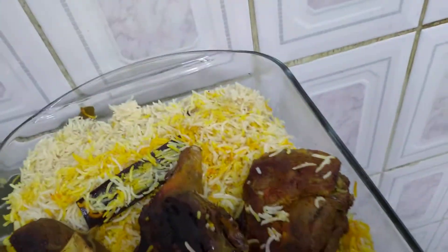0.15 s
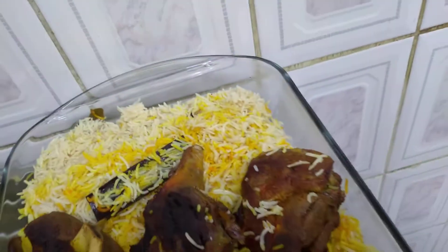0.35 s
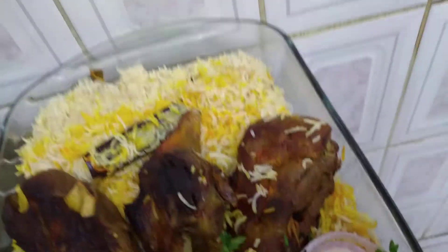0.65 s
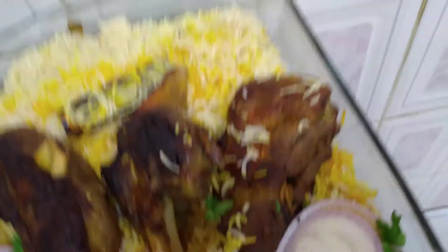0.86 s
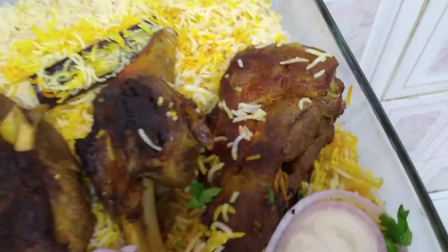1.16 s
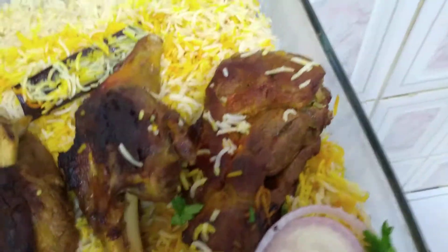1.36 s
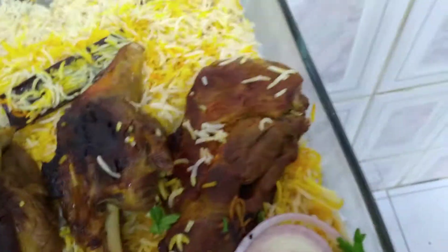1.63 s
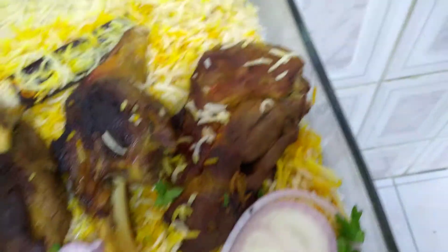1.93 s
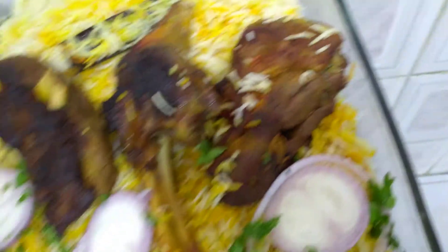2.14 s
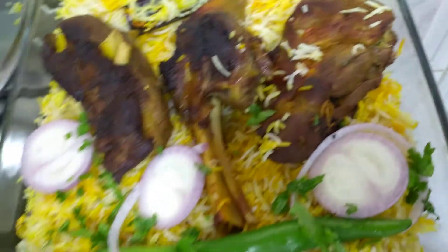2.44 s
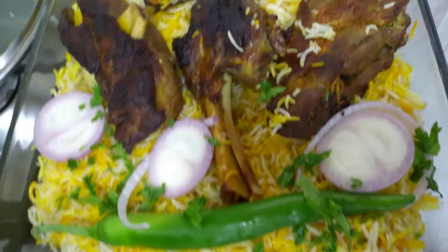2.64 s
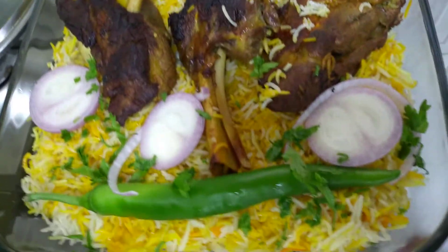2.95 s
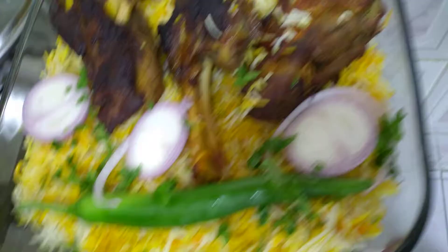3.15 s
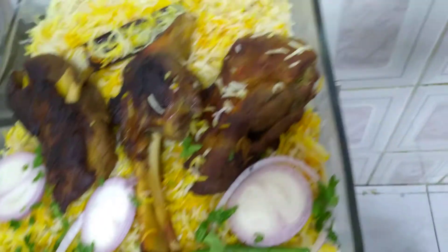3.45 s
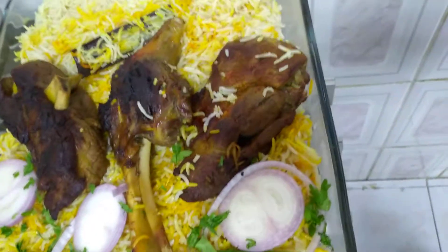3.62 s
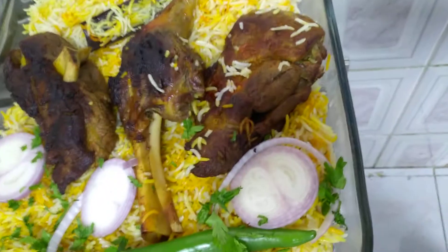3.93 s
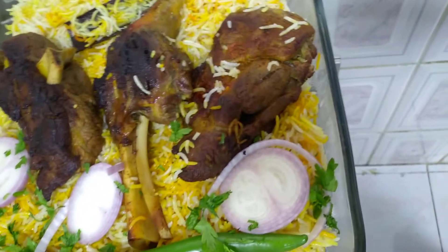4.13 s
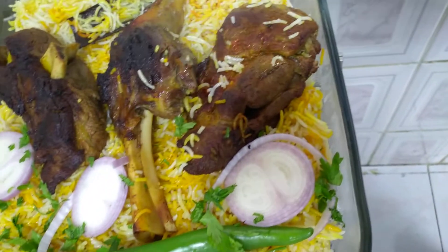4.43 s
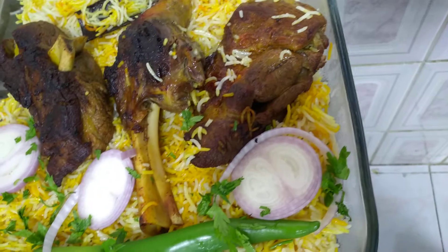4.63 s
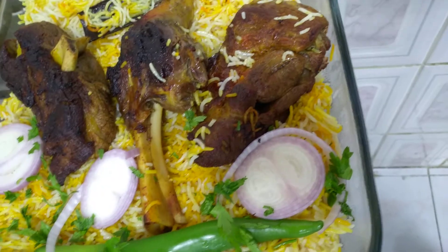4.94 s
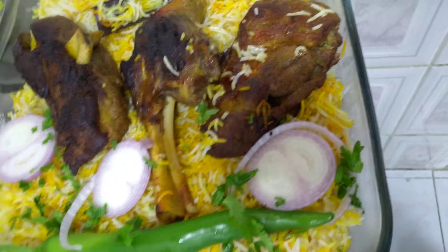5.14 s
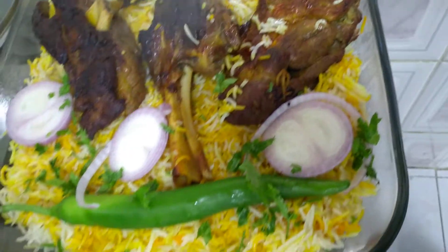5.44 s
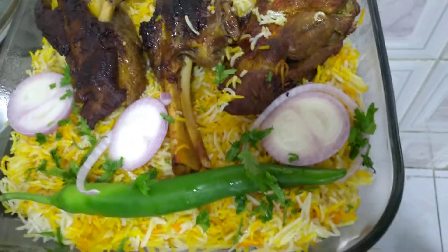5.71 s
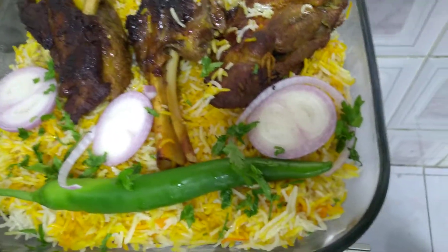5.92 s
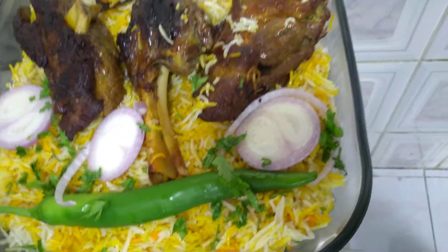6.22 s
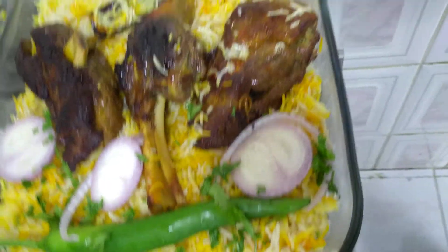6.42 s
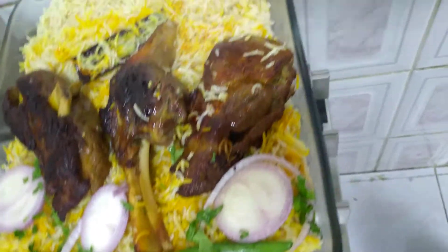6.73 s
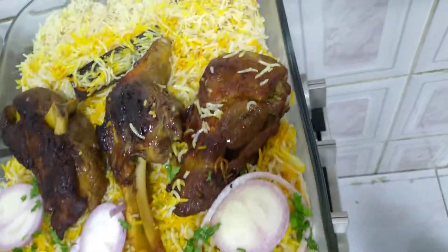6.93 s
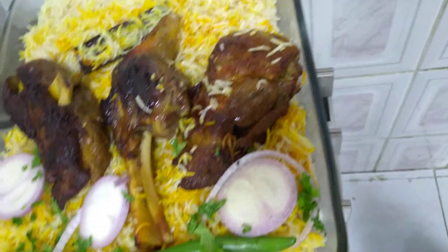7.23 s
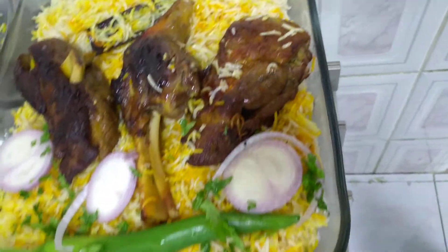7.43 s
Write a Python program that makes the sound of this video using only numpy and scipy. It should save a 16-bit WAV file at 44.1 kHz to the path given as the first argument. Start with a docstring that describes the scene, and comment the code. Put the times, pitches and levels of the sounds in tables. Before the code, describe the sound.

A quiet kitchen hums softly beneath light air hiss and faint flickering tones. A small plastic bottle is tapped and handled, with crisp high clicks growing louder in the middle. Four dry, fizzy nozzle sprays follow in the second half, each under half a second, near the microphone, briefly reflecting off hard tiles. The room hiss returns between and after them.

```python
"""Pump bottle over a glass dish

A small bottle is tapped on a counter, uncapped and pressed four times in a tiled kitchen.
Presses are shaped noise jets, contacts are blows through resonances; both get a decaying noise tail.
An appliance hums in beating sines; short faint tones and narrow noise bands flicker over hiss.
Two ports hear it from close by; the jet and many of the cracks peak near 9 kHz."""
import sys
import numpy as np
from scipy import signal
from scipy.fft import rfft, irfft, next_fast_len
from scipy.io import wavfile
from scipy.ndimage import uniform_filter1d, map_coordinates

SR = 44100
rng = np.random.default_rng(int(sys.argv[2]) if len(sys.argv) > 2 else 0)


def unload_audio(sound):
    """Save the sound as a 16-bit wav file, at the path given as the first command line argument."""
    columns = np.transpose(np.atleast_2d(sound))
    # keep every value between -1 and 1, then stretch to whole-number steps
    steps = np.round(np.clip(columns, -1, 1) * 32767)
    wavfile.write(sys.argv[1], SR, steps.astype(np.int16))


N = 333837
TIME = np.arange(N) / SR

# room air and hiss, relative spectrum: f/Hz, density/dB
FLOOR_SPECTRUM = [(13, -52), (22, -31.5), (76, -3), (103, -3.5), (293, -16), (346, -15), (707, -18),
                  (958, -21.5), (1260, -20.5), (1660, -24.5), (2070, -25.5), (5140, -33.5), (6960, -32.5),
                  (9680, -22.5), (15900, -54)]
# restless part of the room air, relative spectrum: f/Hz, density/dB
STIR_SPECTRUM = [(250, -33.5), (400, 0), (800, 1), (1300, -5), (2300, -15), (3500, -26)]
FLOOR_RMS_DB, STIR_RMS_DB = -59.5, -65.5
# likeness of left and right in diffuse sound: f/Hz, likeness/1
PORT_LIKENESS = [(60, 0.97), (130, 0.96), (290, 0.96), (640, 0.97), (1400, 0.05), (15000, 0.022)]
# decay of the tiled room: f/Hz, t60/s
ROOM_T60 = [(300, 0.12), (1400, 0.29), (4000, 0.27), (10000, 0.24), (16000, 0.19)]

# appliance tones: f/Hz, mean rms level/dB before pan, phase wander/rad
HUM_TONES = [(101.6, -62, 0.7), (115, -68.5, 1), (170.7, -72, 1.3), (63.3, -73, 8.3)]
# soft low bumps: t/s, level/dB before trim and bump shape
BUMPS = [(1.839, -34), (2.401, -35), (2.525, -39), (2.82, -42), (4.072, -38), (4.902, -39.5), (6.293, -34),
         (7.28, -38.5), (7.337, -34)]

# swells of a rough band near 1 kHz: t/s, length/s, level/dB before port trim, f/Hz
LOWER_SWELLS = [(.005, .07, -58, 1020), (.12, .04, -50.5, 1020), (.35, .07, -51.5, 1027),
                (.63, .05, -58.5, 986), (.71, .07, -60, 985), (.92, .09, -55.5, 1000),
                (1.04, .04, -55.5, 970), (1.16, .12, -58, 1080), (1.47, .07, -61, 1020),
                (1.913, 0.059, -62, 983), (2.03, .04, -53, 920), (2.1, .05, -50.5, 1000),
                (2.173, .04, -54.5, 1004), (2.395, .05, -57.5, 950), (2.71, 0.058, -54, 1010),
                (3.11, .03, -51, 980), (3.24, .025, -48.5, 1000), (3.281, .06, -51.5, 970),
                (3.48, .03, -53, 1037), (3.68, .055, -53, 995), (3.92, .04, -60.5, 982),
                (4.113, .015, -51, 955), (4.71, .06, -54, 1008), (4.84, .05, -62, 980),
                (5.04, .04, -57.5, 995), (5.92, 0.025, -46, 1002), (6.49, .06, -61.5, 1000)]
# swells of a thinner band above it: t/s, length/s, level/dB before port trim
UPPER_SWELLS = [(0.002, 0.062, -58.5), (.43, 0.048, -61), (.74, .04, -63), (1.02, 0.035, -53),
                (1.172, .03, -58), (1.27, .07, -63), (1.52, .04, -63.5), (1.74, 0.035, -55.5),
                (1.842, 0.059, -56.5), (1.908, 0.032, -60), (2.08, 0.045, -56), (2.375, .07, -58.5),
                (3.87, .07, -60), (4.57, .1, -59), (5.785, 0.044, -60.5)]
UPPER_BAND_HZ, SWELL_RISE_S = 1584, .009
# fainter noise bands: f/Hz, width/Hz, level/dB at the louder port, left-right/dB
FAINT_BANDS = [(355, 16, -72, 14.5), (495, 58, -72.5, 0), (766, 50, -84.5, 1.5), (2000, 73, -78.5, -7.5),
               (2370, 80, -82.5, 5.5)]
# short tones: t/s, f/Hz, level/dB before flutter, length/s before stretch, left-right/dB
FLICKER_TONES = [(0.29, 870, -51.5, 0.085, -4), (0.085, 2089, -58, 0.022, -17),
                 (0.978, 2244, -61, 0.035, -15), (2.53, 2045, -61.5, 0.065, 4),
                 (2.639, 2890, -54, 0.025, -17), (2.205, 4309, -61, 0.02, 15),
                 (1.651, 2990, -63, 0.04, -15), (1.861, 7960, -61, 0.067, 15), (3.095, 3250, -55, 0.04, -3),
                 (3.39, 1800, -62, 0.03, -10.5), (3.547, 2913, -62, 0.054, 15),
                 (0.673, 2010, -52.5, 0.017, 0), (1.023, 3124, -54.5, 0.068, -8),
                 (1.437, 760, -54, 0.033, 23), (1.631, 559, -44.5, 0.032, -11),
                 (1.651, 3285, -52, 0.037, -25), (1.866, 6700, -55.5, 0.022, 10),
                 (2.13, 2340, -50, 0.018, 19), (2.21, 3860, -46, 0.0089, 7),
                 (2.604, 3023, -51.5, 0.04, -25), (3.612, 605, -41, 0.018, 21),
                 (3.672, 492, -45, 0.028, 17), (3.776, 447, -51, 0.047, 14),
                 (3.871, 1267, -50, 0.04, -15.5), (3.951, 1950, -56.5, 0.043, -19),
                 (4.021, 361, -46, 0.023, -7), (4.649, 467, -46, 0.023, -24),
                 (4.659, 1955, -58.5, 0.051, -13), (5.17, 493, -44.5, 0.05, 13.5),
                 (6.376, 1324, -58, 0.036, 24), (6.505, 819, -51, 0.076, -13),
                 (7.199, 502, -50.5, 0.032, 20), (7.288, 498.5, -51, 0.06, 13.5)]

# contacts of bottle, cap and pump: t/s, crack peak/dB before pan, crack f/Hz, crack Q/1 per pass,
# then re crack: thud/dB, knock/dB, body/dB, clack/dB, edge/dB; left-right/dB, room/dB
CONTACTS = [(0.4832, -23.5, 8630, 3, -11.5, -12.5, -20.5, -37, -18, 4, 7),
            (0.5132, -43.5, 9000, 3.1, 7.5, 5, -4, 9.5, -28, -5, 6),
            (1.5668, -26, 7140, 2.9, -13, -8.5, -13.5, -2, -39, 6.5, 3.5),
            (2.29, -48, 10300, 3, -25, -26, -11, -23, -19, 10, 2),
            (2.9048, -14.5, 9180, 2.9, -16.5, -12.5, -13, -4.5, -24, 6, 5.5),
            (3.0914, -31.5, 8000, 2.8, -19.5, -18, -17, -9, -29, 9.5, 2),
            (3.1376, -37.5, 7100, 2.9, -1.5, -8, -5, -9, -30, 13, 2.5),
            (3.1648, -52, 7300, 1.9, 13.5, 7, 7.5, -7, -33, 4, 0.6),
            (3.3005, -49, 7610, 2.7, -16.5, 3, -1.5, 12.5, -35, 10, 2.5),
            (3.4272, -6, 9350, 5.6, -57, -50, -59, -52, -6, 5, -4),
            (3.5791, -11.5, 9100, 3.9, -45, -40, -38.5, -30, -22, 7, -2),
            (4.1721, -17.5, 8740, 4.5, -40, -45, -29, -14, -11.5, 11, -3),
            (4.192, -9.5, 8870, 4.1, -46.5, -34, -21, -8.5, -29, 12, 6.5),
            (5.5642, -21.5, 10130, 3.5, -40, -22, -14, -11, -23, -5, 4),
            (7.013, -29, 9600, 2.6, -31, -19, -18, -23, -27, -16, 3.5)]
# counter modes, groups slab thud, panel knock, hard rap; per pass: f/Hz, width/Hz, level/dB in group
COUNTER_MODES = [
    [(356.4, 27, 3.5), (423, 36, -0.5), (540, 40, -7.5)],
    [(743, 74, 6.5), (826, 34, 3.5), (890, 49, 2.5), (1051, 62, 1)],
    [(1143, 500, -1), (1430, 150, 6), (1730, 320, 2)],
]
# plastic body modes, per pass: f/Hz, width/Hz, level/dB in group
BODY_MODES = [(2300, 670, 1.5), (2860, 150, -1), (3480, 580, -3.5)]
# sharpest edge, per pass: f/Hz, width/Hz, level/dB in group
EDGE_MODES = [(14000, 5500, 0)]
CLACK_HZ, RAP_RE_BODY_DB = 4800, -8
# gliding bands of rough noise, the second a short faint hiss just before a crack:
# t/s, length/s, from f/Hz, to f/Hz, width/Hz, level/dB before swell
GLIDES = [(2.952, .14, 5660, 4350, 1293, -51.5), (4.131, 0.049, 8480, 8750, 2587, -46)]

# pump presses: t/s, rise/s, length/s, fade/s, jet at first/dB, jet before the fade/dB (both before trim),
# middle re jet/dB, hollow note re jet/dB, hollow f/Hz, left-right/dB, left port lag/ms
PRESSES = [(4.1818, .012, 0.34, .095, -19.5, -22, -13.5, -25, 1012, 2, .092),
           (5.081, .024, 0.48, 0.06, -23.5, -21, -12.5, -19, 984, -1, .2265),
           (5.988, 0.021, .27, 0.06, -21, -23, -14, -21, 986, 4, 0.071),
           (6.6894, 0.021, 0.31, 0.072, -23.5, -24, -14, -20, 923, 1, 0.1854)]
# bright part of the jet, relative spectrum: f/Hz, density/dB
JET_SPECTRUM = [(1760, -39.5), (3000, -24), (4720, -14.5), (5470, -18), (7180, -10), (8310, -5),
                (9490, 0.5), (10400, -3.5), (11600, -15.5), (15100, -20), (15900, -22)]
# middle part of the jet, relative spectrum: f/Hz, density/dB
LOW_JET_SPECTRUM = [(680, -33), (1150, -5), (1450, -0.5), (1840, -1), (2500, 2.5), (3080, -3), (3600, -2),
                    (4680, -25), (7920, -120)]
# left port against the right for the spray: f/Hz, left-right/dB
PORT_SHADE = [(500, -1), (900, -6), (1500, -1), (2400, 2), (3800, -8.5), (5500, 1.5), (7500, 2.5),
              (9500, 1), (11500, -6.5), (15500, -7.5)]
# lift of the jet's lower flank: level at start of press/dB, level at end/dB
FLANK_LIFT_DB = 1.5, -0.5
RISE_DB, FADE_DB = 8.5, 11.5  # deficit at start of rise, end of fade
HOLLOW_LATE_DB, HOLLOW_GROWS_S = 10, .08  # initial deficit, time constant of filling in
TOP_HZ = 16100


def amp(db):
    """Decibels to gain."""
    return 10 ** (np.asarray(db) / 20)


def unit(x):
    """Scale to rms 1."""
    return x / np.sqrt(np.mean(x ** 2) + 1e-20)


def along(points, hz):
    """Interpolate (Hz, value) points on a log frequency axis."""
    f, v = np.transpose(points)
    return np.interp(np.log(hz + 1), np.log(f + 1), v)


def sides(pan_db):
    """Gains of left and right port, the difference split evenly."""
    return amp(np.array([pan_db / 2, -pan_db / 2]))


def louder_side(pan_db):
    """Column of port gains: louder port 0 dB, the other attenuated."""
    return amp(np.minimum([[pan_db], [-pan_db]], 0))


def wobble(rate_hz, channels=1):
    """Smooth random curves, rate_hz knots a second."""
    coarse_s = TIME[::16]
    curves = []
    for _ in range(channels):
        knots = rng.standard_normal(int(N * rate_hz / SR) + 4)
        curves.append(np.interp(TIME, coarse_s, map_coordinates(knots, [coarse_s * rate_hz])))
    return np.array(curves)


def filtered(x, response):
    """Apply a complex frequency response."""
    n = x.shape[-1]
    m = next_fast_len(n + 8192)
    return irfft(rfft(x, m) * response(np.fft.rfftfreq(m, 1 / SR)), m)[..., :n]


def modes(table):
    """Causal response of parallel resonances of alternating sign."""
    def response(f):
        total = 0
        for k, (hz, width_hz, db) in enumerate(table):
            damping = 1j * f * width_hz
            total = total + (-1) ** k * amp(db) * damping / (hz * hz - f * f + damping)
        return total
    return response


def add(out, x, s):
    """Mix x into out from time s."""
    part = out[:, max(round(s * SR), 0):][:, :x.shape[1]]
    part += x[:, :part.shape[1]]


def paired(x):
    """Turn two unrelated signals into left and right that are alike in the bass only."""
    def mid_side(f):
        angle = np.arccos(np.clip(along(PORT_LIKENESS, f), -1, 1)) / 2
        return np.array([np.cos(angle), np.sin(angle)])
    mid, side = filtered(x, mid_side)
    return np.array([mid + side, mid - side])


def patchy(depth_db, size=(4, 8)):
    """Three noises under one field of random gain patches, size in bins by frames."""
    z = signal.stft(rng.standard_normal((3, N)), nperseg=512)[2]
    field = uniform_filter1d(rng.standard_normal(z.shape[1:]), size=size[0], axis=0)
    field = uniform_filter1d(field, size=size[1], axis=1)
    return signal.istft(z * amp(depth_db * unit(field)), nperseg=512)[1][:, :N]


def narrow(hz, width_hz):
    """Stereo narrow noise of rms 1: random quadrature amplitudes on a moving centre."""
    t = np.arange(len(hz)) * width_hz / SR
    knots = rng.standard_normal((4, int(t[-1]) + 2))
    curves = np.array([np.interp(t, np.arange(len(k)), k) for k in knots])
    a, b = curves.reshape(2, 2, -1)
    phase = 2 * np.pi * np.cumsum(hz) / SR
    return unit(a * np.cos(phase) + b * np.sin(phase))


def room(x, gap_s):
    """Convolve with a fresh stereo noise tail, each frequency dying at its own speed."""
    hz, t, z = signal.stft(paired(rng.standard_normal((2, SR // 2))), SR, nperseg=256)
    decay = amp(-60 * t / along(ROOM_T60, hz)[:, None])
    tail = signal.istft(z * decay, SR, nperseg=256)[1]
    tail = np.pad(tail / np.linalg.norm(tail[0]), ((0, 0), (round(gap_s * SR), 0)))
    return signal.fftconvolve(np.atleast_2d(x), tail, axes=1)


def air():
    """Room air and microphone hiss: steady noise plus a restless middle of narrow patches."""
    stir = filtered(patchy(depth_db=7.0, size=(1, 9))[:2], lambda f: amp(along(STIR_SPECTRUM, f)))
    still = filtered(paired(rng.standard_normal((2, N))), lambda f: amp(along(FLOOR_SPECTRUM, f)))
    return amp(FLOOR_RMS_DB) * unit(still) + amp(STIR_RMS_DB) * unit(stir)


def appliance():
    """Wandering low sines, two close ones beating; soft 95 Hz thuds of handling are added here too."""
    hum = 0
    for hz, db, wander_rad in HUM_TONES:
        level = np.sqrt(2) * amp(db + 2.2 * wobble(6.9)[0])
        hum = hum + level * np.sin(2 * np.pi * hz * TIME + wander_rad * wobble(3.2)[0])
    out = hum * sides(-2.2)[:, None]
    t = np.arange(SR // 8) / SR
    bump = np.sin(2 * np.pi * 95 * t) * (t / 0.018) * np.exp(1 - t / 0.01)
    for s, db in BUMPS:
        add(out, amp(db - 3) * sides(-4)[:, None] * bump, s)
    return out


def swells(rows):
    """Gain that rises quickly at each row's time and fades as a bell."""
    gain = 0
    for s, length_s, db, *_ in rows:
        since_s = np.maximum(TIME - s, 0)
        rise = 1 - np.exp(-(since_s / SWELL_RISE_S) ** 2)
        gain = gain + amp(db) * rise * np.exp(-(since_s / length_s) ** 2)
    return gain


def wavering():
    """Narrow noise bands that swell and fade; lower strong one favours right, upper favours left."""
    s, _, _, lower_hz = np.transpose(LOWER_SWELLS)
    lower = narrow(np.interp(TIME, s, lower_hz) * (1 + .03 * wobble(12)[0]), width_hz=140)
    upper = narrow(UPPER_BAND_HZ * (1 + .02 * wobble(12)[0]), width_hz=110)
    lower_gain = swells(LOWER_SWELLS) + amp(-70.5 + 6 * wobble(14))
    upper_gain = swells(UPPER_SWELLS) + amp(-81 + 7 * wobble(9))
    out = amp([[-8], [5]]) * lower_gain * lower
    out += amp([[5], [-8]]) * upper_gain * upper
    for hz, width_hz, db, pan_db in FAINT_BANDS:
        level = amp(db + 6.2 * wobble(15))
        out += level * louder_side(pan_db) * narrow(np.full(N, hz), width_hz)
    return out


def flickers():
    """Short sines with random bend and flutter: listed ones and a random scatter of others."""
    chance = rng.random((420, 5)).T
    scatter = np.transpose([chance[0] * N / SR,
                            300 * 8 ** chance[1],
                            -60 - 12 * chance[1] - 6 * chance[2],
                            .02 + .03 * chance[3],
                            30 * (chance[4] - .5)])
    out, t = np.zeros((2, N)), np.arange(SR // 9) / SR
    for s, hz, db, length_s, pan_db in [*FLICKER_TONES, *scatter]:
        swell = (1 - np.exp(-(t / 0.0047) ** 2)) * np.exp(-(t / (1.1 * length_s)) ** 2)
        bend, flutter = (np.interp(t * 90, np.arange(32), k) for k in rng.standard_normal((2, 32)))
        cycles = np.cumsum(hz * (1 + .02 * bend)) / SR + rng.random((2, 1))
        tone = amp(4.5 * flutter) * swell * np.sin(2 * np.pi * cycles)
        add(out, amp(db) * louder_side(pan_db) * tone, s - .008)  # onset 8 ms ahead of t
    return out + amp(-4.5) * room(out, gap_s=0.0056)[:, :N]


def contacts():
    """A sharp blow with a little chatter rings counter, plastic and edge, then the room."""
    out, t = np.zeros((2, N)), np.arange(SR // 8) / SR
    for (s, db, crack_hz, crack_q, thud_db, knock_db, body_db, clack_db, edge_db,
         pan_db, room_db) in CONTACTS:
        blow = .11 * amp(-60 * t / .012) * rng.standard_normal(len(t))
        blow[0] += 1
        parts = [(COUNTER_MODES[0], thud_db, 1),  # modes, level re crack, filter passes
                 (COUNTER_MODES[1], knock_db, 1),
                 (COUNTER_MODES[2], body_db + RAP_RE_BODY_DB, 2),
                 (BODY_MODES, body_db, 2),
                 ([(CLACK_HZ, 2300, 0)], clack_db, 2),
                 ([(crack_hz, crack_hz / crack_q, 0)], 0, 3),
                 (EDGE_MODES, edge_db, 4)]
        sound = 0
        for table, level_db, passes in parts:
            ring = filtered(blow, lambda f: modes(table)(f) ** passes)
            sound = sound + amp(db + level_db) * ring / np.abs(ring).max()
        ports = [np.roll(sound, shift=1), sound]  # left lags one sample
        add(out, sides(pan_db)[:, None] * ports, s)
        add(out, amp(room_db) * sides(0.35 * pan_db)[:, None] * room(sound, gap_s=.0015), s)
    return out


def glides():
    """Gliding narrow noise, roughened by random grain, under a half-sine swell."""
    out = np.zeros((2, N))
    for s, length_s, from_hz, to_hz, width_hz, db in GLIDES:
        u = np.linspace(0, 1, round(length_s * SR))
        grain_db = 4.3 * np.interp(u * length_s * 400, np.arange(80), rng.standard_normal(80))
        band = narrow(from_hz + (to_hz - from_hz) * u, width_hz)
        add(out, amp(db + grain_db) * np.sin(np.pi * u) * band, s)
    return out


def spray():
    """Turbulent nozzle jet: shared direct noise, scatter off the dish at each port, then the room."""
    out = np.zeros((2, N))
    bright = unit(filtered(patchy(depth_db=1.1), lambda f: amp(along(JET_SPECTRUM, f))))
    low = unit(filtered(patchy(depth_db=1.4), lambda f: amp(along(LOW_JET_SPECTRUM, f))))
    gusts = patchy(depth_db=5.5)
    sputter = amp(0.78 * wobble(250) + 0.32 * wobble(40))  # droplets tear off unevenly
    shared_power = .55  # reaches both ports alike
    for (s, rise_s, length_s, fade_s, first_db, last_db, low_db, hollow_db, hollow_hz,
         pan_db, lag_ms) in PRESSES:
        span = slice(round(s * SR), round((s + length_s) * SR))
        t = TIME[span] - s
        valve = np.clip(t / .0045, 0, 1) * np.clip((length_s - t) / .004, 0, 1)
        jet_db = np.interp(t, [0, rise_s, length_s - fade_s, length_s],
                           [first_db - RISE_DB, first_db, last_db, last_db - FADE_DB])
        hollow_modes = modes([(.78 * hollow_hz, 200, -5), (hollow_hz, 120, 0)])
        hollow = unit(filtered(gusts[:, span], lambda f: hollow_modes(f) ** 2))
        hollow = hollow * amp(hollow_db - HOLLOW_LATE_DB * np.exp(-t / HOLLOW_GROWS_S))
        # the band under the peak is fuller at the start of a press and thins towards its end
        flank = filtered(bright[:, span], lambda f: np.exp(-((f - 7200) / 1300) ** 2))
        flank_gain = amp(np.interp(t, [0, length_s], FLANK_LIFT_DB)) - 1
        jet = bright[:, span] + flank_gain * flank + amp(low_db) * low[:, span] + hollow
        jet = jet * valve * amp(jet_db) * sputter[:, span]
        late = filtered(jet[0], lambda f: np.exp(-2j * np.pi * f * lag_ms / 1000))
        direct = np.array([late, jet[0]])
        near = np.sqrt(shared_power) * direct + np.sqrt(1 - shared_power) * jet[1:]
        add(out, amp(2.0) * near * sides(pan_db)[:, None], s)
        add(out, amp(-4.5) * room(jet[0], gap_s=.004), s)
    return filtered(out, lambda f: sides(along(PORT_SHADE, f)))


def scene():
    """Sum of all sources at the two ports."""
    return air() + appliance() + wavering() + flickers() + contacts() + glides() + spray()


def record(dry):
    """Converter rounds off the highest peaks, then a band limit removes all above TOP_HZ."""
    rounded = dry / (1 + np.abs(dry / .85) ** 6) ** (1 / 6)
    return filtered(rounded, lambda f: np.clip((TOP_HZ - f) / 300, 0, 1) ** 2)


dry = scene()
out = record(dry)
unload_audio(out)
```